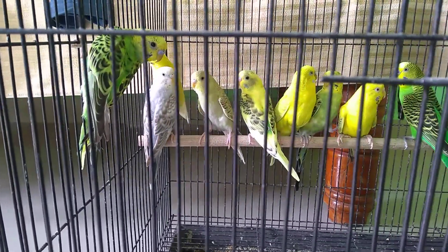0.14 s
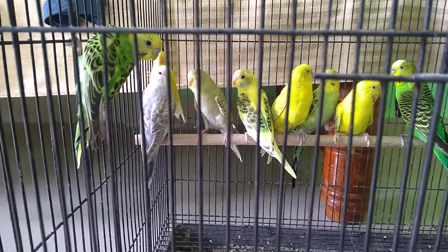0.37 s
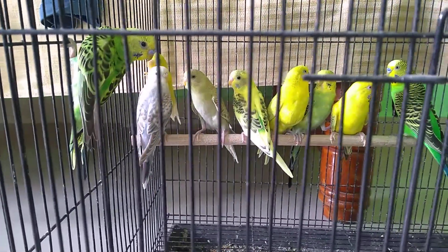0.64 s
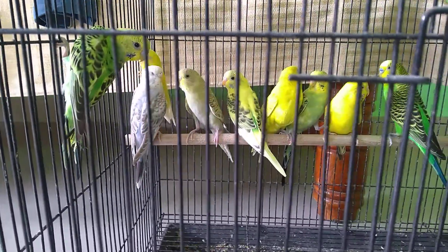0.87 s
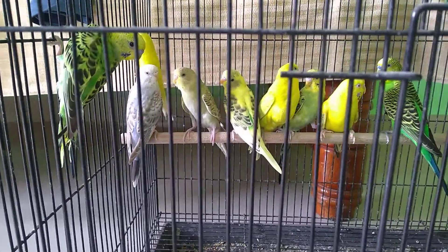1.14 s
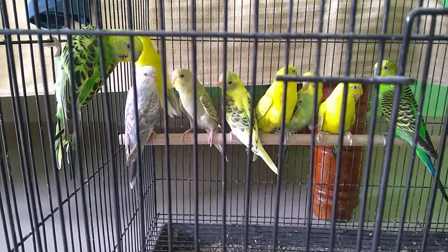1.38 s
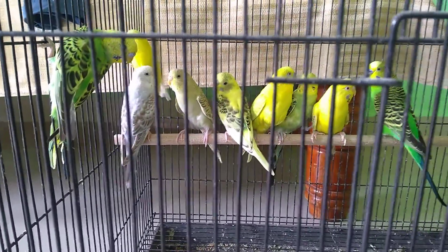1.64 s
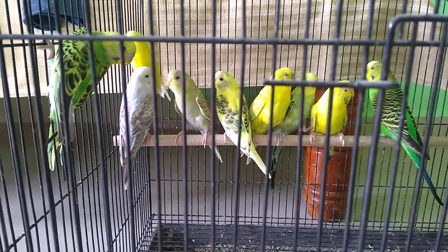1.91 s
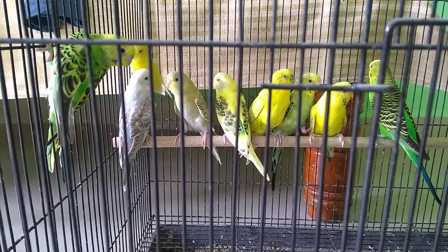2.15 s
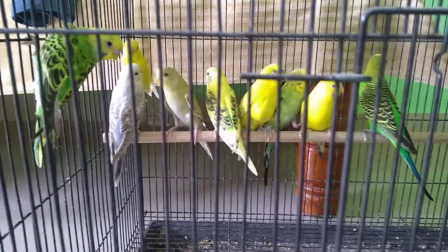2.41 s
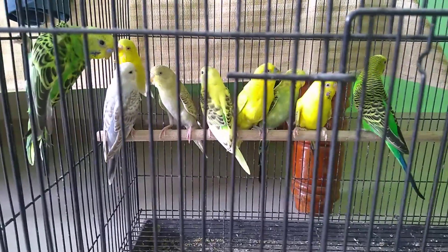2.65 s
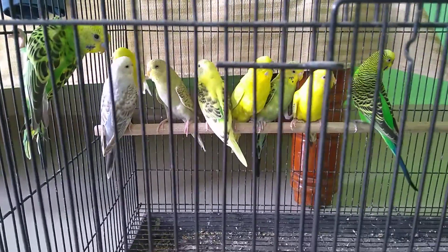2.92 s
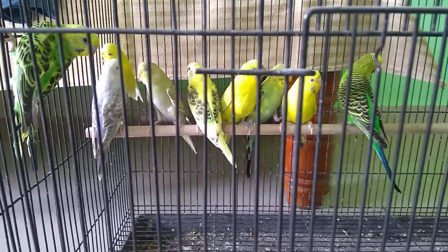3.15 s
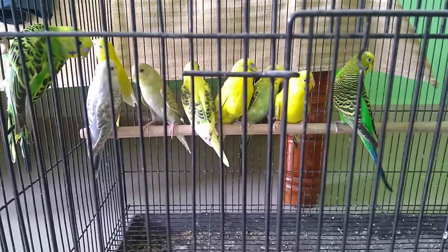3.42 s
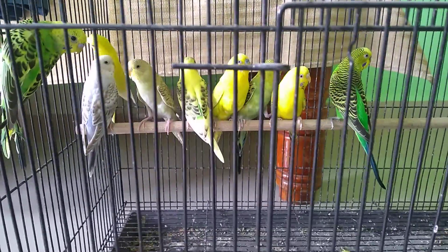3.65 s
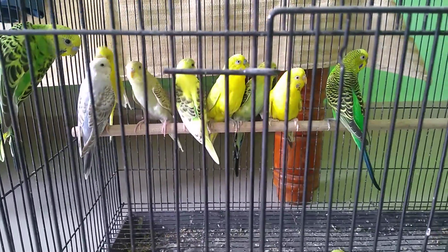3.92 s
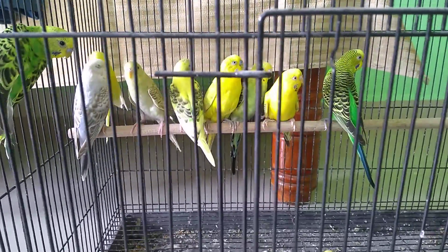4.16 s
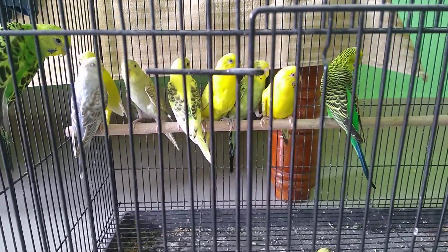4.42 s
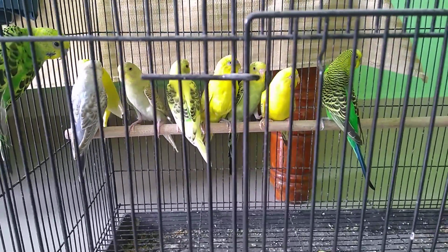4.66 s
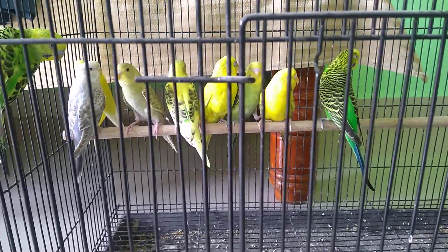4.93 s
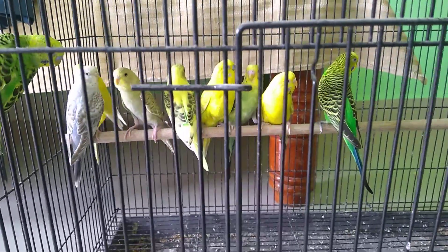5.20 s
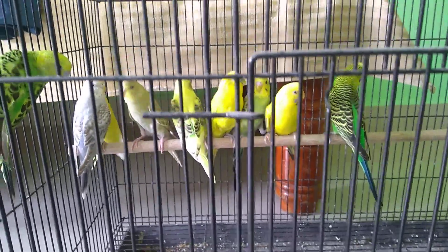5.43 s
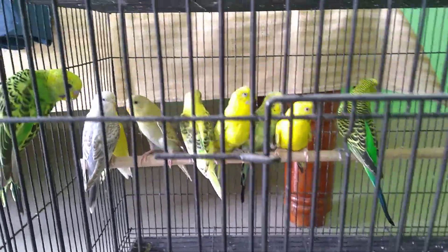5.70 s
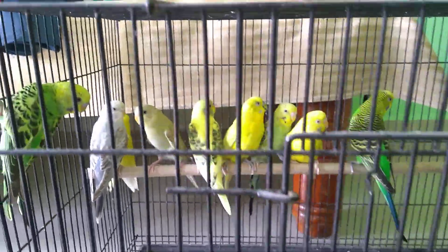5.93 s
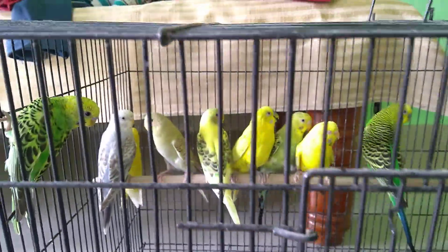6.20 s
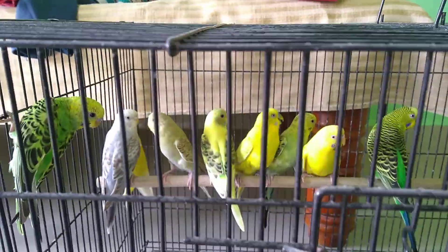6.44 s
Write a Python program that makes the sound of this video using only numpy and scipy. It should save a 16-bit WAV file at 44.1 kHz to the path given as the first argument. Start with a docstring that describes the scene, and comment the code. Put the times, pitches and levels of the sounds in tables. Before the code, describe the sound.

Close stereo pickup of budgies in a hard-walled room. Distant trilled calls blur into echoes above a soft rumbling hum. One near bird scolds in quick raspy syllables, mixed with tiny whistles; after a pause, three short clusters of piercing, gliding chirps ring out. Quiet, lower murmured chirps follow, and the end returns to far twittering with slight feathery rustling.

```python
"""Small parrots whistle quick gliding notes close by, and harsh chatter rattles among them.
A farther flock warbles and twitters, blurred by the walls, over a low building hum, rustling and soft air noise.
Whistles are gliding sines with faint overtones, chatter is a stack of harmonics, far calls are trilling sines
heard only as echoes, and hum, rustle and air are coloured noise.
It is a cage in a hard-walled room, heard by a pair of close microphone ports."""
import sys
import numpy as np
from scipy import signal
from scipy.fft import rfft, irfft
from scipy.io import wavfile
from scipy.ndimage import uniform_filter1d

SR = 44100
rng = np.random.default_rng(int(sys.argv[2]) if len(sys.argv) > 2 else 0)


def voltage_ratio(decibels):
    """Convert decibels (scalar or array-like) to amplitude ratios, 20 dB per decade."""
    exponent = np.asarray(decibels, float) / 20
    return 10 ** exponent


def file_out(sig):
    """Save sig as 16-bit WAV at sys.argv[1]."""
    # one column per channel
    cols = np.atleast_2d(sig).T
    # limit, then scale
    lim = np.clip(cols, -1, 1)
    pcm = np.round(lim * 32767).astype(np.int16)
    wavfile.write(sys.argv[1], SR, pcm)


N = 289737   # length in samples

# Average level of the hum over time. Each row: time in seconds, level in dB.
HUM_LEVEL = [(0, -46.5), (.95, -37), (1.8, -43), (2.25, -39.5), (3.05, -43), (3.9, -38.5), (5.3, -42),
             (5.67, -35.5), (5.9, -45), (6.3, -40), (6.57, -39.5)]
# Colour of the hum noise. Each row: frequency in Hz, relative level in dB.
HUM_COLOUR = [(15, -73), (25, -30), (65, -14), (184, -4.5), (227, -7), (259, -0.5), (452, -2), (647, -30),
              (900, -39.5), (1170, -53), (1980, -120)]
# Soft peaks on the hum colour. Each row: centre in Hz, width in Hz, height in dB.
HUM_PEAKS = [(98.2, 10, 6.5), (332, 1.5, 11), (492.5, 83, 6)]
# Sagging low tones. Each row: start in seconds, length in seconds, start pitch in Hz, end pitch in Hz, level in dB.
LOW_TONES = [(1.5, 0.508, 208.4, 174, -48), (5.44, 0.21, 201.6, 180.5, -45.5)]
# Colour of the steady air noise. Each row: frequency in Hz, relative level in dB.
AIR_COLOUR = [(600, -34.5), (1000, -12.5), (1800, -17), (2200, -19), (3300, 6.5), (4600, -8.5),
              (8800, -26.5), (15500, -29.5)]
# Dry feathers and husks stirring. Each row: start in seconds, length in seconds, level in dB.
RUSTLES = [(4.135, 0.33, -71), (4.9, 1, -76), (5.827, 0.51, -63), (6.332, 0.26, -68)]
# Colour of the rustle. Each row: frequency in Hz, relative level in dB.
RUSTLE_COLOUR = [(8600, 10), (10100, 9), (11500, -10), (12500, -3), (13500, -22), (14600, 11), (15500, -25)]
# How alike the noise is on both sides. Each row: frequency in Hz, likeness from -1 (opposite) to 1 (same).
SIDE_LIKENESS = [(60, 1), (130, 0.8), (290, 0.52), (640, 1), (1400, 0.61), (3100, -0.24), (7000, -0.071)]
# Head start of the left side in noise. Each row: frequency in Hz, lead in radians.
LEFT_LEAD = [(60, 3.5), (130, 2.57), (290, 1.29), (640, 0.35)]
# How long the walls ring, before each use stretches it. Each row: frequency in Hz, time to fall 60 dB in seconds.
ROOM_DECAY = [(1200, 0.76), (3000, 0.94), (7000, 0.59), (14000, 0.43)]
# High twitter over time. Each row: time in seconds, level in dB, middle pitch in Hz.
TWITTER_PATH = [(0, -63.5, 5800), (.4, -63.5, 5940), (.52, -52.5, 6260), (.95, -42.5, 6055),
                (1.27, -50.5, 6317), (1.38, -51.5, 7460), (2.4, -55, 5190), (2.7, -80, 5290),
                (3.35, -53.5, 5320), (3.7, -45, 5732), (4.1, -82, 5710), (4.3, -45, 5780),
                (4.45, -56.5, 5930), (4.6, -47.5, 6280), (5.0, -52.5, 6470), (5.5, -45.5, 5630),
                (5.87, -49, 5730), (6.15, -43.5, 6536), (6.57, -47.5, 5980)]
# Calls of the far flock. Each row: start in seconds, length in seconds, top pitch in Hz,
# relative level in dB, time over which the trill widens in seconds.
FAR_CALLS = [(0.242, 0.18, 4100, -27.5, .12), (0.564, 0.97, 4430, -47, 0.15),
             (0.735, 0.24, 4246, -26.5, 0.15), (1.035, 0.23, 3775, -35, 0.12),
             (1.824, 0.28, 4264, -30.5, 0.16), (2.139, 0.085, 4180, -30.5, 0.17),
             (2.342, 0.11, 4100, -33.5, 0.068), (2.693, 0.18, 4170, -30, 0.29),
             (3.008, 0.18, 4080, -33.5, .14), (3.182, 0.12, 4236, -30.5, 0.098),
             (4.06, 0.19, 4330, -35, 0.076), (4.41, 0.226, 4293, -28.5, 0.24),
             (4.746, 0.2, 3516, -34, 0.12), (5.337, 0.28, 4020, -28.5, 0.12),
             (6.116, 0.21, 4110, -40, 0.13), (6.365, 0.13, 3440, -40.5, .14)]
# Lowest pitch of each far throat, in Hz.
THROAT_BOTTOM_HZ = [2200, 2400, 2600, 2900]
# Chatter syllables. Each row: start in seconds, length in milliseconds, top pitch in Hz, relative level in dB.
CHATTER_SYLLABLES = [(1.417, 27.6, 2125, -21.5), (1.475, 16.7, 2054, -21), (1.526, 18, 2397, -19.5),
                     (1.576, 19.5, 2194, -18), (1.632, 24, 2240, -19.5), (1.697, 29, 2212, -19.5),
                     (1.755, 26, 2170, -22.5), (1.838, 33, 2546, -24), (1.967, 29.8, 2220, -19.5),
                     (2.031, 27.7, 2282, -23), (2.099, 34, 2276, -23)]
# Pitch path of a syllable, up and then over. Each row: share of its length, share of its top pitch.
SYLLABLE_SCOOP = [(0, .38), (.2, .72), (.45, .94), (.65, 1), (1, .78)]
# Colour of the open beak. Each row: frequency in Hz, gain in dB.
BEAK_COLOUR = [(900, -0.5), (2200, -12.5), (3200, -0.5), (4400, 1), (6500, -8.5), (8000, -16), (11500, -19),
               (15500, -38)]
# Near whistles. Each row: start in seconds, length in milliseconds, start pitch in Hz, end pitch in Hz,
# relative level in dB.
WHISTLE_NOTES = [(1.652, 22, 2830, 2137, -22), (1.679, 22, 3310, 3300, -18), (1.698, 11, 3050, 2820, -25.5),
                 (1.705, 15, 3430, 3870, -22), (1.728, 25, 3164, 2630, -21), (1.748, 9.2, 3550, 3580, -24),
                 (1.768, 25.5, 1785, 1536, -23.5), (1.843, 14, 1630, 1000, -36),
                 (2.874, 19, 3960, 4070, -16.5), (2.881, 16, 4040, 5450, -19), (2.894, 11, 3930, 3450, -11),
                 (2.901, 1.5, 5530, 3860, -24), (2.896, 79, 2130, 1740, -35),
                 (2.904, 14.6, 4370, 4200, -9.5), (2.913, 12, 4294, 3500, -15),
                 (2.923, 13, 3120, 3020, -24.5), (2.935, 4.4, 3700, 3500, -19.5),
                 (2.939, 9.5, 2970, 3210, -25.5), (2.945, 9.2, 3840, 3530, -19),
                 (2.956, 30, 3025, 2656, -24.5), (2.973, 20.6, 2162, 974, -29),
                 (3.408, 14.7, 3840, 4220, -25), (3.422, 12, 4400, 3360, -15), (3.434, 11, 4310, 3790, -11),
                 (3.445, 14.8, 3640, 2846, -14.5), (3.456, 17, 2220, 1806, -16),
                 (3.472, 6.7, 3610, 3390, -10.5), (3.48, 15, 3423, 2803, -19.5),
                 (3.489, 19, 2753, 2595, -16.5), (3.502, 17.3, 2350, 1000, -24),
                 (3.611, 185, 1145, 1354, -34), (3.653, 85, 3900, 4010, -33.5),
                 (3.766, 18, 4040, 3730, -22), (3.781, 11, 3800, 3580, -18.5),
                 (3.79, 13.1, 3716, 2785, -11.5), (3.795, 24, 2605, 2230, -26.5),
                 (3.815, 10.1, 2780, 3380, -13.5), (3.827, 13.16, 3470, 2650, -12),
                 (3.839, 23, 2933, 3786, -14.5), (3.857, 32, 3100, 2374, -22.5),
                 (3.901, 32.8, 1696, 1480, -22), (4.485, 69, 732, 817, -47), (4.544, 21, 796, 1497, -30),
                 (4.559, 21, 1453, 1497, -33.5), (4.615, 8.6, 920, 1074, -31.5),
                 (4.65, 16, 930, 2290, -31.5), (4.668, 9.3, 1940, 940, -45), (4.805, 20, 1860, 2114, -31),
                 (4.821, 14, 1940, 1370, -43.5), (4.864, 37, 808, 1124, -36), (4.893, 17, 1180, 2200, -33),
                 (4.908, 22, 2064, 1690, -35), (4.929, 62, 1947, 1333, -38.5),
                 (4.98, 44.5, 1472, 1320, -45.5)]
# Where the whistling bird sits. Each row: time in seconds, left level minus right level in dB,
# delay of the left side in microseconds (negative is early).
WHISTLE_PLACE = [(1.7, -3.5, 251), (2.9, -4, -310), (3.45, 1, 247), (3.7, 2.5, 54), (3.83, -11.5, 244.5),
                 (3.92, -1.5, 116), (4.6, 0.5, 107)]
# Strength of whistle overtones by their own pitch. Each row: frequency in Hz, relative level in dB.
OVERTONE_COLOUR = [(1600, -8), (3000, -10), (4200, -15), (5200, -32), (6500, -28), (8200, -18),
                   (10500, -42), (13500, -30)]


def rms_one(x):
    """Scales a sound to an average (rms) size of 1."""
    return x / np.sqrt(np.mean(x ** 2) + 1e-20)


def in_time(rows):
    """Joins table rows with straight lines, giving one value per sample for each column after the time."""
    seconds, *columns = np.transpose(rows)
    return [np.interp(np.arange(N) / SR, seconds, column) for column in columns]


def at_hz(points, hz):
    """Reads a frequency table between its rows, on a logarithmic frequency scale."""
    table_hz, values = np.transpose(points)
    return np.interp(np.log(np.maximum(hz, 1)), np.log(table_hz), values)


def drift(rate_hz):
    """Slow random wandering of spread 1: noise smoothed twice by a one-pole low-pass."""
    memory = np.exp(-20 * np.pi * rate_hz / SR)   # computed at a tenth of the sample rate
    noise = rng.standard_normal(N // 10 + 4002)
    slow = signal.lfilter([1], [1, -2 * memory, memory ** 2], noise)[4000:]   # skip the filter's start
    return np.interp(np.arange(N) / 10, np.arange(len(slow)), rms_one(slow))


def glide(hz):
    """Adds up a changing pitch into the phase of a wave."""
    return 2 * np.pi * np.cumsum(hz) / SR


def swell(share, edge):
    """Rounded rise and fall, each taking the given share of the sound."""
    nearest_end = np.minimum(share, 1 - share)
    return np.sin(np.pi / 2 * np.clip(nearest_end / edge, 0, 1)) ** 2


def add(track, start_s, sound):
    """Mixes a short sound into a track at its start time."""
    i = round(start_s * SR)
    track[i:i + len(sound)] += sound


def late(x, microseconds):
    """Reads a sound a little later, as if it travelled farther."""
    return np.interp(np.arange(len(x)) - microseconds * SR / 1e6, np.arange(len(x)), x)


def stereo_noise(gain_of_hz):
    """Coloured noise whose sides share a common part and a part of opposite sign, as the room field sets."""
    hz = np.fft.rfftfreq(N, 1 / SR)
    alike = np.clip(at_hz(SIDE_LIKENESS, hz), -1, 1)
    mid, side = rfft(rng.standard_normal((2, N))) * gain_of_hz(hz)
    left_right = np.array([[1], [-1]])
    lead = np.exp(0.5j * at_hz(LEFT_LEAD, hz) * left_right)
    both = np.sqrt(1 + alike) * mid + np.sqrt(1 - alike) * side * left_right
    return irfft(both * lead, N)


def room(x, stretch, shared, lead_us):
    """Walls answer with noise that dies band by band; its shared part reaches the left side lead_us earlier."""
    t = np.arange(SR) / SR
    common, left, right = rng.standard_normal((3, SR))
    sides = [left + shared * common, right + shared * np.roll(common, round(lead_us * SR / 1e6))]
    edges_hz = 500 * 2 ** np.arange(0, 5.1)   # octave bands
    tail = 0
    for low, high in zip(edges_hz, edges_hz[1:]):
        band = signal.sosfilt(signal.butter(2, [low, high], "band", fs=SR, output="sos"), sides)
        decay_s = stretch * at_hz(ROOM_DECAY, np.sqrt(low * high))
        tail = tail + band * voltage_ratio(-60 * t / decay_s)
    tail = tail * voltage_ratio(-150 * t ** 2)   # the tail dies ever faster
    tail = tail * np.clip((t - 0.004) / 0.02, 0, 1)   # silent for 4 ms, then thickens over 20 ms
    tail = tail / np.sqrt(np.mean(np.sum(tail ** 2, axis=1)))
    return signal.fftconvolve(x[None], tail, axes=1)[:, :N]


def breathy(voice, db, low_hz, high_hz):
    """Air rushing past the syrinx (voice organ) hisses in step with the voice, more the higher it sings."""
    bend = np.diff(voice, n=2, prepend=[0, 0])   # grows with loudness and pitch
    effort = np.sqrt(uniform_filter1d(bend ** 2, size=90) + 1e-14)
    band = signal.butter(6, [low_hz, high_hz], "band", fs=SR, output="sos")
    hiss = signal.sosfilt(band, rng.standard_normal(N))
    return voice + voltage_ratio(db) * effort * rms_one(hiss)


def hum(patchy_db=3.0, fringe_db=7.5):
    """A low noise roar with soft peaks; its registers swell on their own, and the top fringe swings widest."""
    def colour(hz):
        peaks = sum(db / (1 + (2 * (hz - at) / width) ** 2) for at, width, db in HUM_PEAKS)
        return voltage_ratio(at_hz(HUM_COLOUR, hz) + peaks) * (hz < 900)
    roar = rms_one(stereo_noise(colour))
    level_db = in_time(HUM_LEVEL)[0]
    out = 0
    gain_db = np.mean(level_db)   # the deepest register does not follow the level table
    for edge_hz in [170, 330, 620]:
        above = signal.sosfiltfilt(signal.butter(3, edge_hz, "high", fs=SR, output="sos"), roar)
        register = roar - above
        out = out + register * voltage_ratio(gain_db + patchy_db * drift(10.0))
        roar = above
        gain_db = level_db
    return out + roar * voltage_ratio(level_db + fringe_db * drift(33.0))


def low_tones():
    """Soft sines whose pitch sags in a straight line."""
    out = np.zeros(N)
    for start_s, length_s, start_hz, end_hz, db in LOW_TONES:
        share = np.linspace(0, 1, round(length_s * SR))
        tone = np.sin(glide(start_hz + (end_hz - start_hz) * share))
        add(out, start_s, voltage_ratio(db) * swell(share, edge=0.024) * tone)
    return out


def air():
    """Steady soft noise above 600 Hz, spread over both sides, at -53.5 dB rms."""
    noise = stereo_noise(lambda hz: voltage_ratio(at_hz(AIR_COLOUR, hz)) * (hz > 600))
    return voltage_ratio(-53.5) * rms_one(noise)


def rustle():
    """Bright grainy noise, silent until something stirs."""
    noise = rms_one(stereo_noise(lambda hz: voltage_ratio(at_hz(RUSTLE_COLOUR, hz)) * (hz > 8600)))
    stir = np.zeros(N + SR)
    for start_s, length_s, db in RUSTLES:
        share = np.linspace(0, 1, round(length_s * SR))
        add(stir, start_s, voltage_ratio(db) * swell(share, edge=0.4))
    grain = voltage_ratio(1.8 * drift(40))
    return stir[:N] * grain * noise


def twitter(octaves=0.38, count=8):
    """Many small birds glide up to some octaves about a common high pitch; their echoes merge to a shimmer."""
    level_db, middle_hz = in_time(TWITTER_PATH)
    voices = np.zeros(N)
    for bird in range(count):
        wander = np.tanh(0.6 * drift(30))
        voices += np.sin(glide(middle_hz * 2 ** (octaves * wander)))
    return voltage_ratio(level_db) * rms_one(room(voices, stretch=0.29, shared=0.26, lead_us=410))


def far_birds(fall_db=-11.5):
    """Far calls trill down from a top pitch, ever further, in several broken throats; only the echo arrives."""
    out = np.zeros(N + SR)
    for bottom_hz in THROAT_BOTTOM_HZ:
        trill = np.tanh(0.6 * np.abs(drift(30)))
        chop = voltage_ratio(5 * drift(30))   # breaks the call into syllables
        for start_s, length_s, top_hz, db, spread_s in FAR_CALLS:
            share = np.linspace(0, 1, round(length_s * SR))
            first = round(start_s * SR)
            widening = np.clip(0.083 + share * length_s / spread_s, 0, 1)
            depth = np.resize(trill[first:], len(share)) * widening
            tone = np.sin(glide(top_hz * (bottom_hz / top_hz) ** depth))
            level = voltage_ratio(db - 1.5 + fall_db * depth ** 2)   # softer toward the bottom
            broken = np.resize(chop[first:], len(share))
            add(out, start_s, level * broken * swell(share, edge=0.1) * tone)
    return room(out[:N] / 2, stretch=1.0, shared=0.98, lead_us=20)


def chatter(rough=0.45, jitter=0.025):
    """A pulsing syrinx gives harmonics of a scooping pitch, coloured by the beak; upper ones bloom near the top."""
    out = np.zeros(N)
    flutter, wobble = 1 + rough * drift(430), 1 + jitter * drift(760)   # unsteady loudness and pitch
    for start_s, length_ms, top_hz, db in CHATTER_SYLLABLES:
        share = np.linspace(0, 1, round(length_ms * SR / 1000))
        hz = top_hz * np.interp(share, *np.transpose(SYLLABLE_SCOOP))
        hz = hz * wobble[round(start_s * SR):][:len(share)]
        phase = glide(hz)
        stack = 0
        for k in range(1, 8):
            beak = voltage_ratio(at_hz(BEAK_COLOUR, k * hz)) * (k * hz < 16000)
            bloom = (hz / top_hz) ** (0.23 * (k - 1))
            stack = stack + beak * bloom * np.sin(k * phase)
        add(out, start_s, voltage_ratio(db) * swell(share ** 0.79, edge=0.31) * stack)
    return breathy(out * flutter, db=-18, low_hz=2960, high_hz=9750)


def whistles(rough=0.25, jitter=0.02):
    """Each note is a near sine gliding between two pitches, with faint overtones and an unsteady breath."""
    out = np.zeros(N)
    flutter, wobble = 1 + rough * drift(150), 1 + jitter * drift(120)   # unsteady loudness and pitch
    for start_s, length_ms, start_hz, end_hz, db in WHISTLE_NOTES:
        share = np.linspace(0, 1, round(length_ms * SR / 1000))
        ease = 1.49 if end_hz > start_hz else 0.57   # rising notes level off, falling ones slide more evenly
        hz = start_hz + (end_hz - start_hz) * np.expm1(-ease * share) / np.expm1(-ease)
        hz = hz * wobble[round(start_s * SR):][:len(share)]
        phase = glide(hz)
        tone = np.sin(phase)
        for k in (2, 3):
            tone = tone + voltage_ratio(at_hz(OVERTONE_COLOUR, k * hz)) / (k - 1) ** 2 * np.sin(k * phase)
        add(out, start_s, voltage_ratio(db) * swell(share, edge=0.25) * tone)
    return breathy(out * flutter, db=-13, low_hz=4500, high_hz=10000)


def scene():
    """Places the near birds left and right, adds their echoes, and mixes in the far birds and background."""
    notes, harsh = whistles(), chatter()
    side_db, lag_us = in_time(WHISTLE_PLACE)
    near = np.array([late(notes, lag_us), notes]) * voltage_ratio([side_db / 2, -side_db / 2])
    bounce = late(harsh, 308.0)   # the cage wall throws the chatter back into the left port
    near += [voltage_ratio(-2.0) * (harsh + 0.55 * bounce), harsh]
    walls = room(voltage_ratio(-4.5) * notes + voltage_ratio(-5) * harsh, stretch=0.83, shared=0.39, lead_us=-280)
    walls = walls * voltage_ratio([[-1.0], [1.0]])   # echoes are stronger on the right
    background = hum() + low_tones() + air() + rustle()
    return background + twitter() + far_birds() + walls + near


def band_limit(x):
    """A steep low-pass at the top of the band."""
    return signal.sosfilt(signal.butter(12, 15600, fs=SR, output="sos"), x)


def record(dry):
    """The microphone loses the very top, above about 15 kHz."""
    low_pass = signal.butter(6, 15000, fs=SR, output="sos")
    mix = signal.sosfilt(low_pass, dry)
    return band_limit(mix)


dry = scene()
out = record(dry)
file_out(out)
```